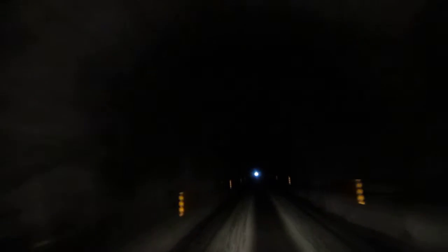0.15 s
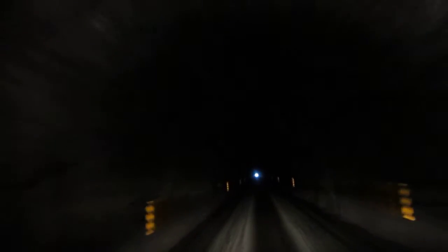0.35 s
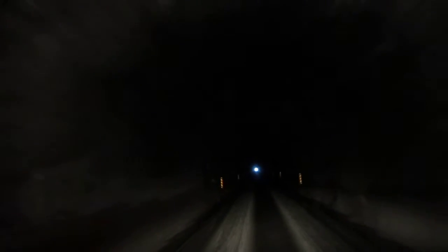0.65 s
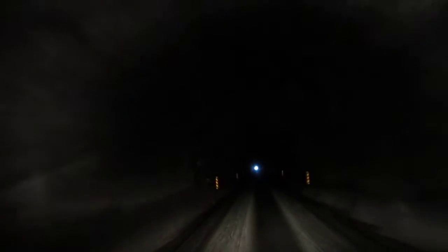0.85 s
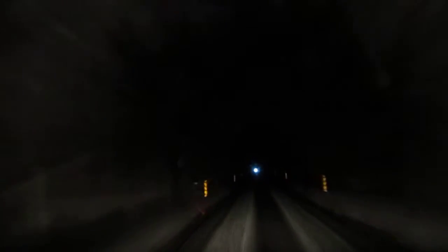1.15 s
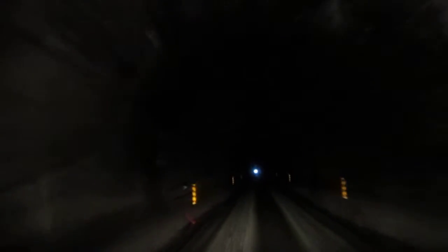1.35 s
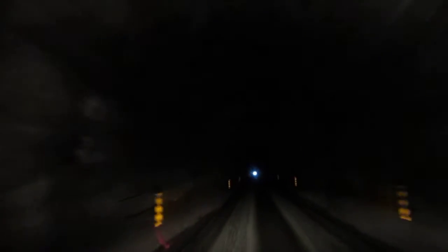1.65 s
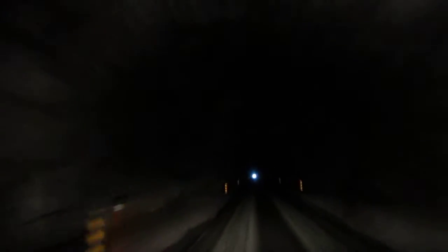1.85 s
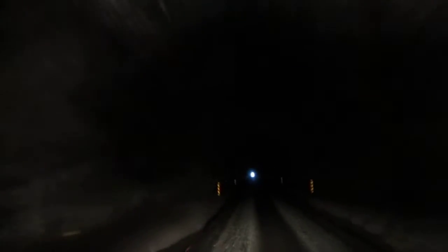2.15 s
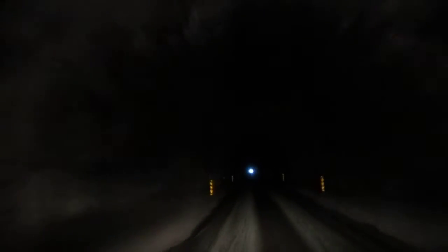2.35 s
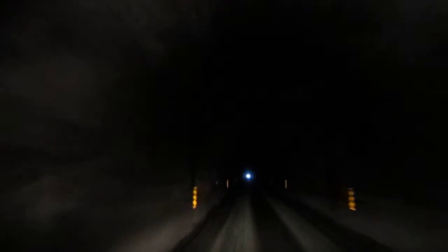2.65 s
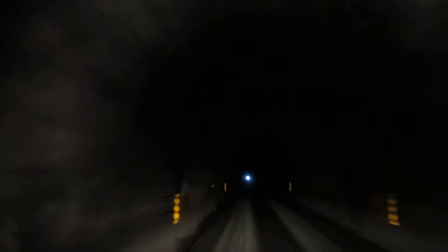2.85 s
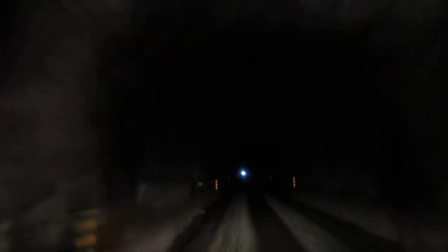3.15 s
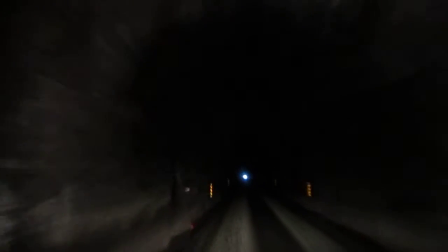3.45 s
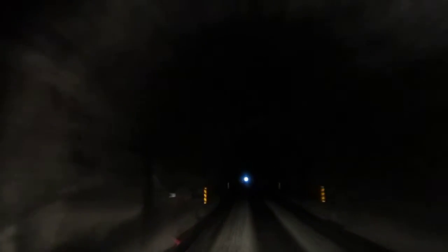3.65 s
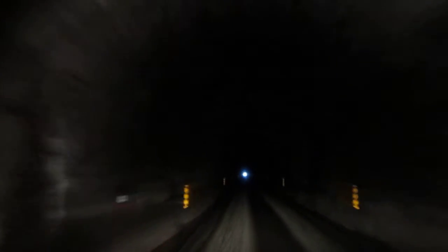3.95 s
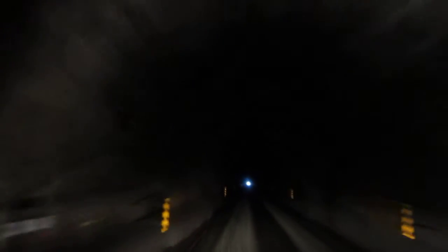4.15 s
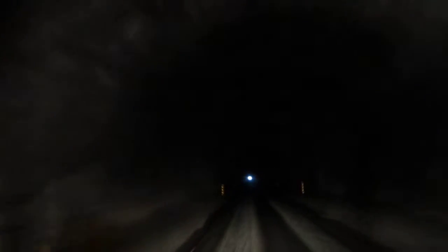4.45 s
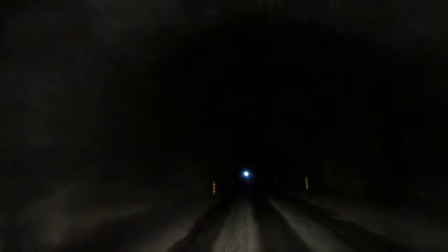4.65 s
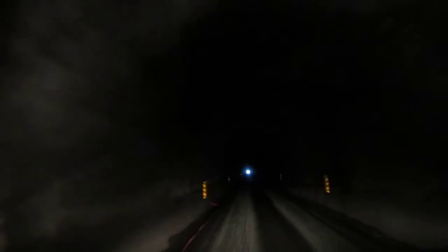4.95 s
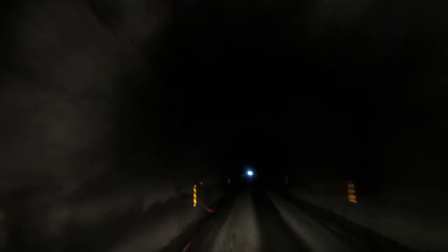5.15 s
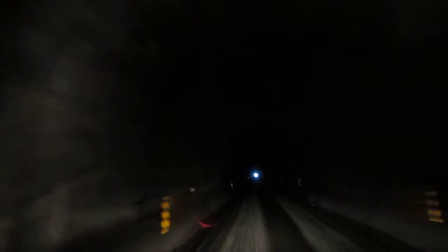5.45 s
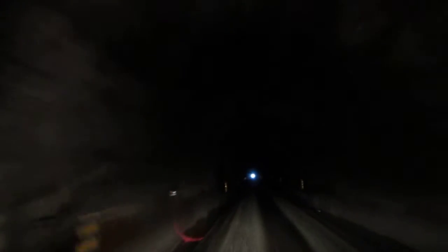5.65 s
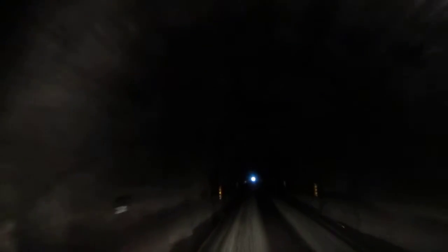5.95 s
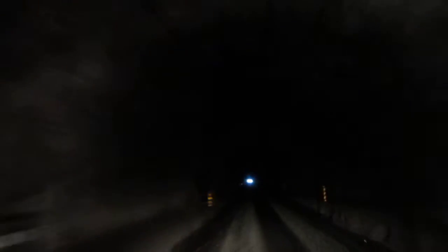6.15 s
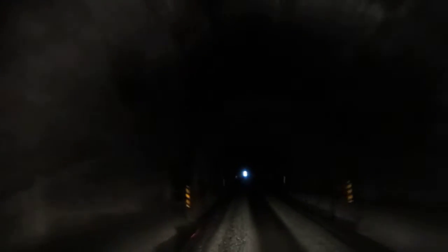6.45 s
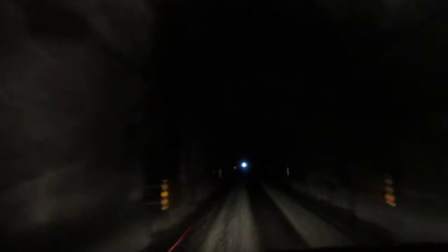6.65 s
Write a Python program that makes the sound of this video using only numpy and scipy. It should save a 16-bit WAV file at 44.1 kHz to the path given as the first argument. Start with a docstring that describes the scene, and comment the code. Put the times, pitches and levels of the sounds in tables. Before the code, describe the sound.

Heard from behind the windscreen, a car's engine hums low and even while a rough tunnel road shakes the body into a heavy, pulsing rumble. The tyres roar with a fine sandy crunch and brief swells of wet hiss. Loose trim taps lightly, panels creak and small stones tick throughout. Shortly before the end a single hard crack with a dull thud cuts through the continuing rumble.

```python
"""Car cabin in a rock tunnel

A car runs at a nearly steady speed through a rock tunnel, heard from inside the cabin.
The rough road shakes body and cabin air, whose modes are noise-driven resonances, under the sine drone of
the engine; the tyres are coloured noise and grains: they roar, crunch and hiss over damp patches. Loose trim
rattles, panels creak, grit ticks and one hard crack sounds: short noise bursts and decaying sines.
"""
import sys
import numpy as np
from scipy import signal
from scipy.fft import rfft, irfft
from scipy.io import wavfile
from scipy.ndimage import uniform_filter1d

SR = 44100
rng = np.random.default_rng(int(sys.argv[2]) if len(sys.argv) > 2 else 0)


def to_wav(s):
    """Save 16-bit WAV."""
    ch = np.atleast_2d(s).T  # columns
    pcm = np.round(np.clip(ch, -1, 1) * 32767)  # PCM
    wavfile.write(sys.argv[1], SR, pcm.astype(np.int16))


N = 300321

# Tyre roar on the changing road surface. Each row: time in seconds, level in dB.
ROAD_ROAR = [(0, -37), (0.15, -35.5), (0.7, -38.5), (1.25, -37), (1.8, -36.5), (2.1, -37.5), (2.6, -35.5),
             (3.2, -35), (4.1, -34), (4.7, -35), (5.05, -36), (5.35, -34.6), (6.2, -35), (6.81, -35)]


def body_boom(rise_s=0.03, fall_s=0.038, shake_db=-28, shake_swing_db=3.2, shakes_per_s=8):
    """Bumps make the low body modes swell and die away; between bumps the body keeps shaking."""
    # Wheels meeting bumps. Each row: start in seconds, length in seconds, level of the boom in dB.
    bumps = [(0.102, 0.045, -17), (0.26, 0.057, -17.5), (0.436, 0.23, -20), (0.84, 0.31, -22),
             (1.127, 0.072, -15.5), (1.44, 0.088, -22), (1.706, 0.085, -17.5), (1.895, 0.14, -19),
             (2.107, 0.23, -22), (2.6, 0.23, -19.5), (3.048, 0.096, -20), (3.464, .03, -18),
             (3.632, 0.065, -19.5), (3.82, .09, -15.5), (4.038, 0.045, -17), (4.376, 0.094, -17.5),
             (4.686, 0.087, -17), (4.927, 0.067, -16.5), (5.153, 0.07, -17.5), (5.422, 0.11, -20),
             (5.78, 0.016, -18.5), (5.96, 0.028, -13.5), (6.542, 0.05, -17), (6.673, .04, -17.5)]
    # Low modes of the body. Each row: frequency in Hz, width in Hz, relative level in dB.
    body_modes = [(34, 4, -4), (38.3, 1.8, 0), (42.8, 4, -7)]
    shake = from_db(shake_db + shake_swing_db * drift(shakes_per_s))
    swells = [from_db(db) * swell(s, length, rise_s, fall_s) for s, length, db in bumps]
    jolts = np.max(swells, axis=0)
    return np.hypot(shake, jolts) * humming(body_modes)


def suspension_rumble():
    """Finer road texture rumbles through the suspension as coloured noise of changing level."""
    # Spectrum of the rumble. Each row: frequency in Hz, relative density in dB per Hz.
    rumble_spectrum = [(13, -16), (26, 6.5), (50, 3.5), (77, 2), (86, 7), (102, 0.5), (125, 1.5),
                       (140, -4.5), (158, 0.5), (172, -2), (210, -2), (268, -4), (305, -11.5), (500, -29.5)]
    # Its course. Each row: time in seconds, level in dB.
    rumble_course = [(0, -25), (0.2, -24), (0.7, -30), (1.0, -28), (1.45, -26.5), (1.85, -26),
                     (2.25, -28.5), (3.33, -26), (3.9, -28), (4.07, -23.5), (4.2, -26.5), (4.7, -25),
                     (5.15, -27.5), (5.95, -27), (6.81, -27.5)]
    level_db, = in_time(rumble_course)
    return from_db(level_db) * coloured(rng.standard_normal(N), rumble_spectrum)


def cabin_air(rise_s=0.032, fall_s=.05):
    """The enclosed air hums faintly all the time; now and then one of its modes swells to a clear tone."""
    # Modes of the cabin air. Each row: frequency in Hz, width in Hz, level in dB.
    air_modes = [(55.5, 8, -29), (68.3, 6, -34.5)]
    # The air set ringing. Each row: start in seconds, length in seconds, level in dB, frequency in Hz.
    air_surges = [(0.273, 0.052, -20.5, 56), (0.537, 0.092, -21.5, 56), (0.99, 0.38, -28.5, 68),
                  (1.74, 0.3, -24.5, 56.5), (5.248, 0.25, -23, 56), (6.518, .08, -20, 54)]
    t = np.arange(N) / SR
    tones = np.zeros(N)
    for s, length, db, hz in air_surges:
        tone = np.sin(2 * np.pi * (hz * t + rng.random()))
        tones += from_db(db) * swell(s, length, rise_s, fall_s) * tone
    return shaken(air_modes) + np.sqrt(2) * tones


def engine(phase_waver_rad=.15, level_waver_db=1.44, level_wavers_per_s=3.3,
           overtone_db=-59, whine_hz=7855, whine_db=-83):
    """The firing order drones in the cabin, with a weak overtone and a very faint whine far above it."""
    # Engine speed. Each row: time in seconds, firing rate in Hz.
    firing_rate = [(0, 89.73), (3.3, 90.36), (4.0, 90), (5.8, 89.6), (6.2, 92.06), (6.81, 92.2)]
    # Engine drone. Each row: time in seconds, level in dB.
    drone_course = [(0.0, -32), (0.27, -26.5), (0.7, -23.5), (0.8, -36.5), (0.99, -24.5), (1.35, -30),
                    (2.0, -28), (2.65, -30), (3.2, -24), (3.32, -34), (3.58, -23.5), (3.72, -30.5),
                    (3.82, -26.5), (4.9, -26.5), (6.81, -29.5)]
    (hz,), (drone_db,) = in_time(firing_rate), in_time(drone_course)
    phase = 2 * np.pi * np.cumsum(hz) / SR + phase_waver_rad * drift(2.5)
    drone_gain = from_db(drone_db + level_waver_db * drift(level_wavers_per_s))
    drone = drone_gain * np.sin(phase)
    overtone = from_db(overtone_db) * np.sin(5 * phase)
    whine_phase = 2 * np.pi * np.cumsum(whine_hz + 5 * drift(18)) / SR
    whine = from_db(whine_db) * np.sin(whine_phase)
    return np.sqrt(2) * (drone + overtone + whine)   # levels are rms


def tyre_roar(flutter_db=0.6):
    """The tread drums on the road: coloured noise through the panels, its level following the surface."""
    # Spectrum of the roar. Each row: frequency in Hz, relative density in dB per Hz.
    roar_spectrum = [(220, 2), (310, -3), (352, 3.5), (400, -1.5), (560, -2), (615, -3), (700, 0),
                     (910, -4.5), (1180, -14), (1380, -17.5), (2700, -28.5), (4000, -35.5), (12000, -56)]
    level_db, = in_time(ROAD_ROAR)
    gain = from_db(level_db + flutter_db * drift(3.5))
    return gain * coloured(rng.standard_normal(N), roar_spectrum)


def sand_crunch(grains_per_s=1200, mean_roughness_db=-53.5, db_per_roar_db=2):
    """Sand crunches under the tread: random tiny impacts, louder where the road is rougher."""
    # Spectrum of the crunch. Each row: frequency in Hz, relative density in dB per Hz.
    crunch_spectrum = [(1150, 3), (1400, 3), (1900, -1), (2900, -7.5), (4500, -16)]
    gain = from_db(mean_roughness_db + db_per_roar_db * roughness_db())
    return gain * coloured(grains(grains_per_s), crunch_spectrum)


def tyre_spray(drops_per_s=500, drop_share=0.34, flutter_db=1.25, fall_s=0.1,
               mist_db=-66, mist_db_per_roar_db=1.8):
    """The treads throw a hiss of fine mist with single drops in it; it swells on each damp patch."""
    # Spectrum of the spray. Each row: frequency in Hz, relative density in dB per Hz.
    spray_spectrum = [(1200, 1), (3000, 4), (5000, 2), (7000, 1.5), (9300, 0), (12000, -4), (14000, -10),
                      (16000, -17)]
    # Damp patches. Each row: start in seconds, length in seconds, spray level in dB, rise in seconds.
    damp_patches = [(0.02, .1, -65.5, .05), (0.32, 0.12, -63.5, .06), (1.76, 0.21, -64.5, .06),
                    (2.26, 0.27, -61.5, 0.049), (2.696, 0.18, -54, 0.14), (3.135, 0.079, -56.5, 0.066),
                    (3.76, 0.1, -60.5, .05), (4.19, 0.18, -54, 0.17), (4.698, 0.36, -56.5, .04),
                    (5.223, 0.18, -62, 0.058), (5.98, 0.12, -61.5, 0.13), (6.416, 0.17, -56.5, 0.082),
                    (6.697, .1, -60.5, .05)]
    mist = rng.standard_normal(N) + drop_share * grains(drops_per_s)
    swells = [from_db(db) * swell(s, length, rise, fall_s) for s, length, db, rise in damp_patches]
    on_patches = np.max(swells, axis=0)
    between = from_db(mist_db + mist_db_per_roar_db * roughness_db())
    wetness = np.hypot(between, on_patches)
    return wetness * from_db(flutter_db * drift(25)) * coloured(mist, spray_spectrum)


def crack(start_s=5.9446, spike_height=.32, spike_s=.000035, build_s=0.00084,
          splinter_db=-33.0, ring_db=-29, echo_db=-28, thud_db=-19):
    """A hard contact: a pressure spike, a splintering snap, a short ring, dense reflections, a dull thud."""
    # What the crack rings with. Each row: frequency in Hz, relative level in dB, 60 dB decay in seconds.
    crack_modes = [(353, 3, 0.084), (745, -2, .045), (1060, 2, 0.045), (1487, -4, 0.05), (1830, 0, 0.032),
                   (2240, 0.5, 0.023), (2600, -1, 0.034), (3440, -3, 0.025), (3780, -9, 0.021),
                   (5050, -7, 0.026)]
    out, t = np.zeros(N), short_time()
    building = 1 - np.exp(-t / build_s)   # ring and reflections build up just after the spike
    spike = -spike_height * t / spike_s * np.exp(1 - t / spike_s)
    splinter = burst(dying(0.018), hz=6500, width=7000)
    ring = building * struck(crack_modes, scatter_db=2.0)
    reflections = building * burst(dying(0.05), hz=1920, width=1300)
    thud = dying(0.077) * np.sin(2 * np.pi * 200 * t)
    add(out, start_s, spike)
    add(out, start_s, from_db(splinter_db) * splinter)
    add(out, start_s, from_db(ring_db) * ring)
    add(out, start_s, from_db(echo_db) * reflections)
    add(out, start_s, from_db(thud_db) * thud)
    return out


def creaks(panel_db=2.5, thump_db=9.5, thump_hz=390, slips_per_s=260, slip_s=0.003):
    """Panels stick and slip in quick succession; the panel answers lower down, with a dull thump."""
    # Bursts of slips. Each row: start in seconds, level in dB, centre in Hz, length in seconds.
    slip_bursts = [(0.682, -55.5, 3300, 0.0078), (2.312, -45, 3630, 0.0086), (2.33, -53, 2800, 0.0068),
                   (3.14, -51, 3800, 0.0087), (3.593, -52, 3540, .005), (4.408, -50, 3200, 0.011),
                   (5.926, -48, 3700, .003), (6.728, -46, 2460, 0.0065), (6.78, -40.5, 2400, 0.006),
                   (6.785, -42, 3300, 0.0027)]
    out, t = np.zeros(N), short_time()
    for s, db, hz, length in slip_bursts:
        since_slip = t % (rng.uniform(.8, 1.2) / slips_per_s)
        release = np.exp(-np.maximum(t - length, 0) / 0.0061)
        slipping = rms_one(np.exp(-since_slip / slip_s)) * release
        rub = resonance(burst(slipping, hz, width=940), hz, width=5800)
        panel = resonance(burst(slipping, hz=1490, width=950), hz=1500, width=2100)
        thump = dying(0.058) * np.sin(2 * np.pi * thump_hz * t)
        add(out, s, from_db(db) * rub)
        add(out, s, from_db(db + panel_db) * panel)
        add(out, s, from_db(db + thump_db) * thump)
    return out


def grit(snap_t60=0.026, ring_t60=0.028, ring_width=0.16, specks_per_s=9, speck_db=-66.0):
    """Small stones hit the wheel arches: a bright snap and a brief ring; fainter specks fall in between."""
    # Stones. Each row: start in seconds, snap level in dB, ring level in dB, ring frequency in Hz.
    stones = [(0.318, -53, -47, 3100), (0.368, -56, -54, 4700), (0.466, -62, -52, 4150),
              (0.605, -59, -55, 4250), (0.651, -60, -58, 5000), (1.001, -59, -54, 3800),
              (1.120, -55, -55, 4600), (1.616, -58, -58, 9300), (1.764, -51, -51, 4000),
              (1.812, -56, -55, 4700), (2.232, -50, -47, 3700), (2.785, -51, -46, 3200),
              (3.495, -48, -51, 5200), (4.088, -50, -48, 4240), (4.345, -50, -43, 3420),
              (4.397, -50, -45, 3430), (5.261, -46, -41.5, 9100), (5.371, -47, -51, 8600),
              (5.784, -55, -56, 9440), (6.09, -62, -48, 3900), (6.367, -48, -49, 3900),
              (6.467, -50, -50, 4000)]
    out = np.zeros(N)
    specks = []
    for when, strength, spot in rng.random((int(specks_per_s * N / SR), 3)):
        levels_db = speck_db + 7 * strength, speck_db + 9 * strength
        specks.append((when * N / SR, *levels_db, 3000 + 2000 * spot))
    for s, snap_db, ring_db, hz in list(stones) + specks:
        snap = burst(dying(snap_t60), hz=7500, width=7800)
        ring = resonance(burst(dying(ring_t60), hz, width=ring_width * hz), hz, width=4000)
        add(out, s, from_db(snap_db) * snap)
        add(out, s, from_db(ring_db) * ring)
    return out


def trim():
    """A loose piece taps: a faint dry snap and a brief ring of its modes."""
    # Taps. Each row: start in seconds, level in dB.
    taps = [(0.013, -57), (0.121, -52), (1.179, -51.5), (1.210, -52), (1.272, -55), (1.302, -56),
            (1.333, -51.5), (1.394, -48.5), (1.424, -52), (1.729, -53), (1.736, -45), (2.255, -49.5),
            (2.289, -52.5), (3.737, -52), (5.182, -52.5), (6.042, -52), (6.321, -51.5), (6.627, -53)]
    # Modes of the piece. Each row: frequency in Hz, relative level in dB, 60 dB decay in seconds.
    trim_modes = [(1740, 1, 0.036), (2620, 2, 0.046), (2860, 1, 0.025), (4020, -6, 0.034),
                  (4800, -2, 0.038), (5430, -4, 0.036), (6520, -2, 0.024), (6850, -4, 0.022),
                  (7480, -9, 0.016), (8650, -9, 0.016)]
    out = np.zeros(N)
    for s, db in taps:
        snap = .6 * burst(dying(.03), hz=5200, width=6000)
        add(out, s, from_db(db) * (struck(trim_modes, scatter_db=2.0) + snap))
    return out


def roughness_db():
    """How much rougher the road is than its mean, in dB of roar."""
    db, = in_time(ROAD_ROAR)
    return db - db.mean()


def humming(modes):
    """Shaken modes with their beating evened out to about rms 1, so that an envelope can set the level."""
    ringing = shaken(modes)
    power = np.abs(signal.hilbert(ringing)) ** 2 / 2
    return ringing / np.sqrt(uniform_filter1d(power, size=SR // 12))


def shaken(modes):
    """Low modes shaken at random, each ringing on in a narrow band."""
    out = np.zeros(N)
    for hz, width, db in modes:
        shaking = rng.standard_normal(N + SR)   # the first second lets the mode build up
        ringing = resonance(resonance(shaking, hz, width), hz, width)
        out += from_db(db) * rms_one(ringing[SR:])
    return out


def struck(modes, scatter_db=1.0):
    """One blow: every mode rings with a strength and a slight detuning of its own."""
    t = short_time()
    strengths = from_db(scatter_db * rng.standard_normal(len(modes)))
    detuning = 1 + .003 * rng.standard_normal(len(modes))
    out = np.zeros(len(t))
    for k, (hz, db, t60) in enumerate(modes):
        gain = strengths[k] * from_db(db) * (-1) ** k   # neighbours start in opposite directions
        out += gain * dying(t60) * np.sin(2 * np.pi * hz * detuning[k] * t)
    return out


def burst(envelope, hz, width):
    """Resonant noise under an envelope."""
    return envelope * rms_one(resonance(rng.standard_normal(len(envelope)), hz, width))


def grains(per_s):
    """Tiny impacts of random size at random times; rms 1."""
    return rms_one((rng.random(N) < per_s / SR) * rng.standard_normal(N))


def resonance(x, hz, width):
    """Two-pole band-pass with a gain of about 1 on top."""
    r = np.exp(-np.pi * width / SR)
    feedback = [1, -2 * r * np.cos(2 * np.pi * hz / SR), r * r]
    return signal.lfilter([(1 - r * r) / 2, 0, (r * r - 1) / 2], feedback, x)


def coloured(x, spectrum):
    """Give a steady excitation a spectrum that falls away past its ends; rms 1."""
    hz, db = np.transpose(spectrum)
    f = np.maximum(np.arange(N // 2 + 1) * SR / N, 1)
    skirts = np.minimum(f / hz[0], 1) ** 2 * np.minimum(hz[-1] / f, 1) ** 2
    gain = from_db(np.interp(np.log(f), np.log(hz), db))
    return rms_one(irfft(rfft(x) * skirts * gain, N))


def drift(rate):
    """Slow random wandering of rms 1, weaker above the rate in Hz."""
    f = np.arange(N // 2 + 1) * SR / N
    return rms_one(irfft(rfft(rng.standard_normal(N)) / (1 + (f / rate) ** 2), N))


def swell(start, length, rise, fall):
    """Exponential attack, hold and exponential release, over the whole scene."""
    t = np.arange(N) / SR - start
    return np.exp(np.minimum(t, 0) / rise - np.maximum(t - length, 0) / fall)


def short_time():
    """Seconds since a short event began, for a fifth of a second."""
    return np.arange(SR // 5) / SR


def dying(t60):
    """An envelope that falls at 60 dB per t60 seconds, a fifth of a second long."""
    return np.exp(-np.log(1000) * short_time() / t60)


def in_time(rows):
    """Each column of a curve at every sample."""
    s, *columns = np.transpose(rows)
    return [np.interp(np.arange(N) / SR, s, c) for c in columns]


def add(out, s, sound):
    """Mix a sound in at a time in seconds."""
    i = max(round(s * SR), 0)
    out[i:i + len(sound)] += sound[:max(N - i, 0)]


def from_db(db):
    """Decibels to gain."""
    return 10 ** (np.asarray(db) / 20)


def rms_one(x):
    """Scale to unit rms."""
    return x / np.sqrt(np.mean(x ** 2) + 1e-20)


def scene():
    """Everything as it arrives at one point behind the windscreen; the upholstery dulls the clicks."""
    upholstery = signal.butter(3, 12500, fs=SR, output="sos")
    clicks = signal.sosfilt(upholstery, trim() + creaks() + crack() + grit())
    body = body_boom() + cabin_air() + suspension_rumble()
    tyres = tyre_roar() + sand_crunch() + tyre_spray()
    return (body + engine() + tyres + clicks)[None, :]


def record(dry, cutoff_hz=15800):
    """The top is cut steeply, by a filter that has settled before the sound starts."""
    run_in = np.pad(dry, ((0, 0), (SR, 0)), mode="edge")
    steep_cut = signal.ellip(10, .1, 80, cutoff_hz, fs=SR, output="sos")
    return signal.sosfilt(steep_cut, run_in)[:, SR:]


dry = scene()
out = record(dry)
to_wav(out)
```